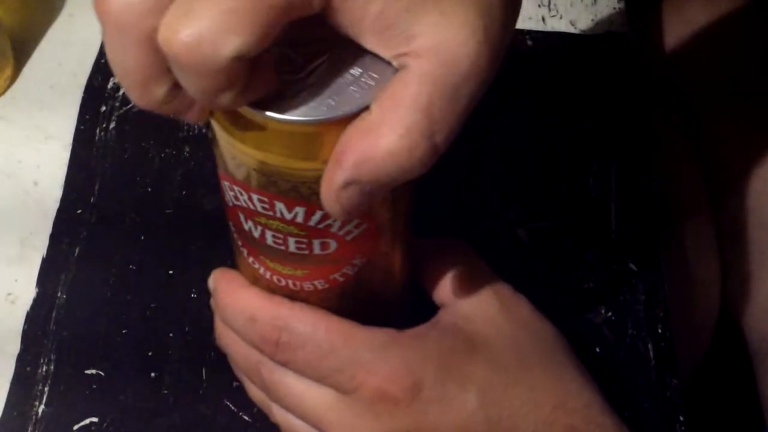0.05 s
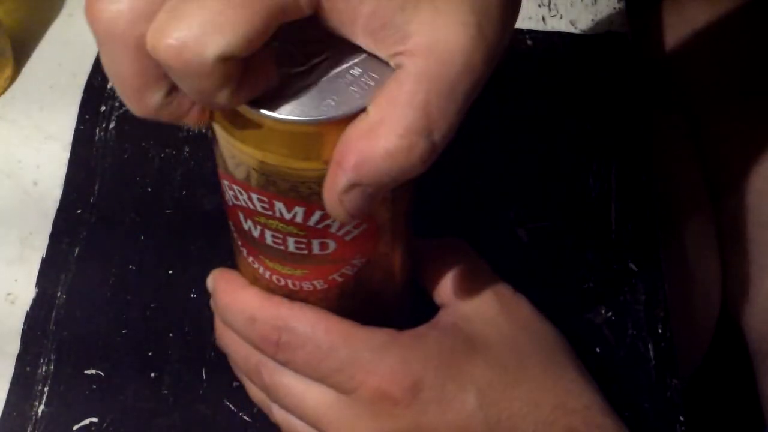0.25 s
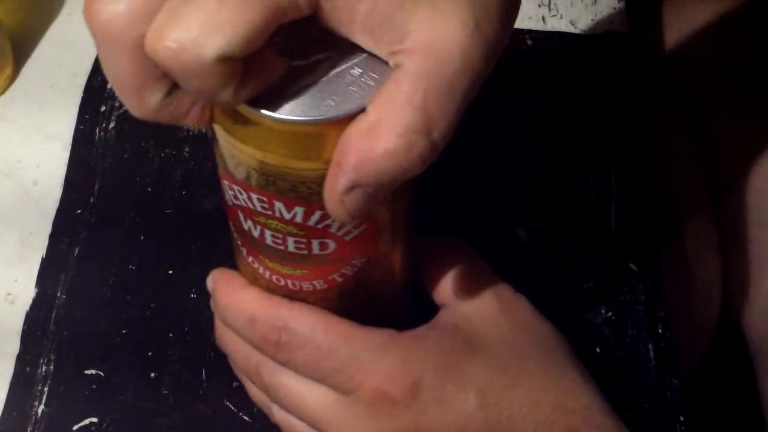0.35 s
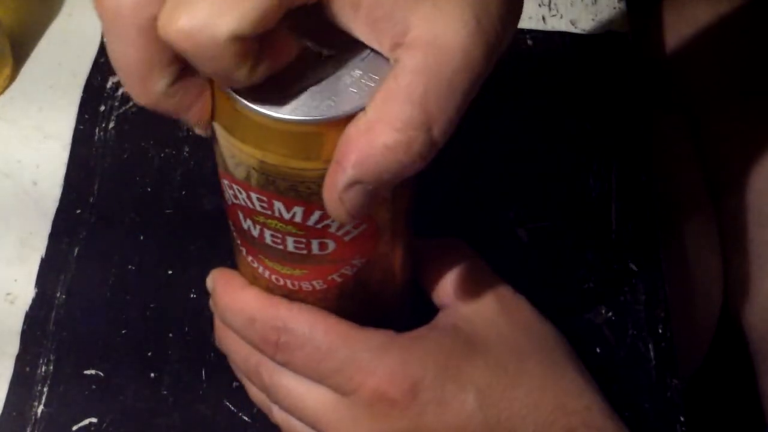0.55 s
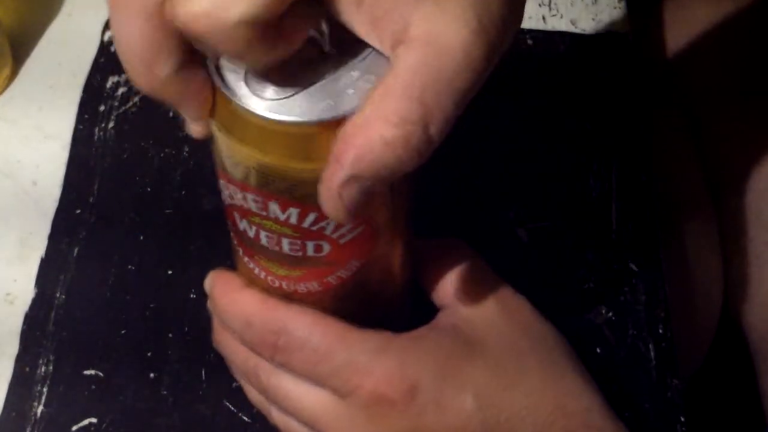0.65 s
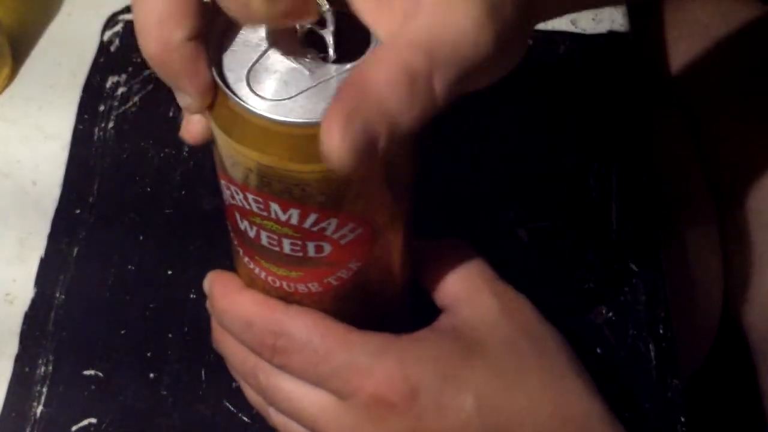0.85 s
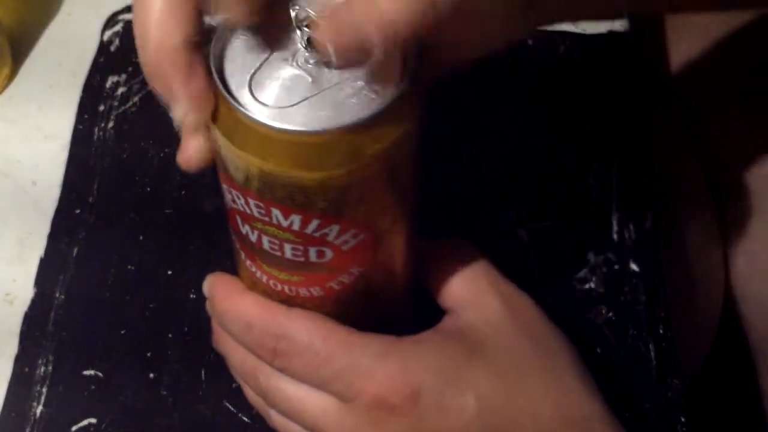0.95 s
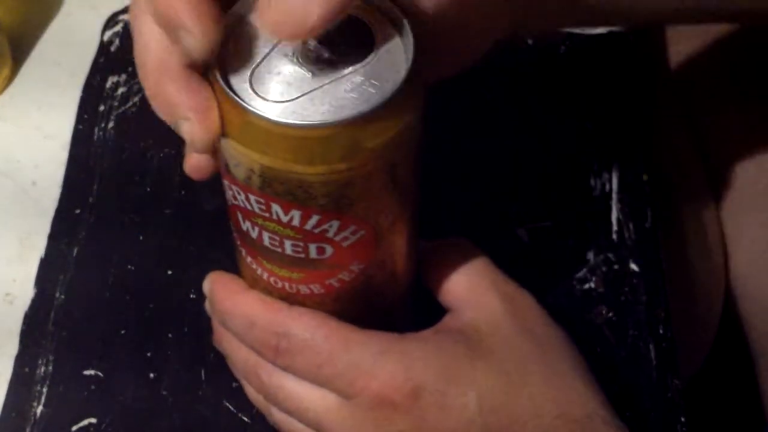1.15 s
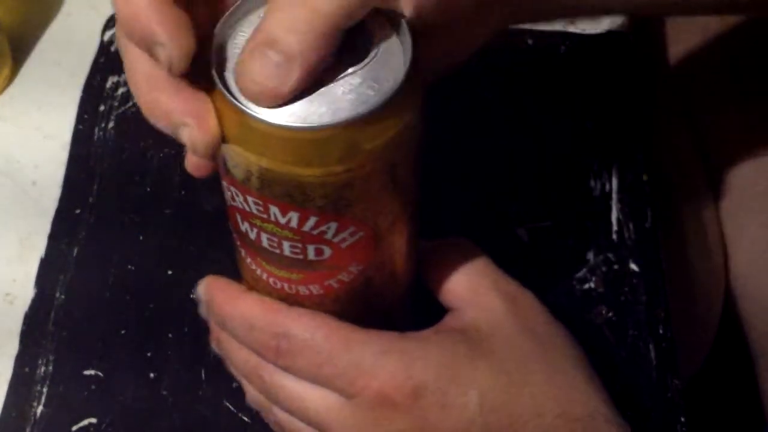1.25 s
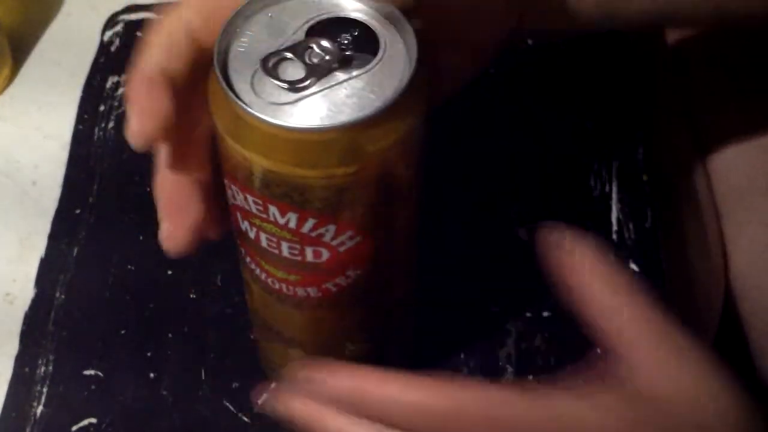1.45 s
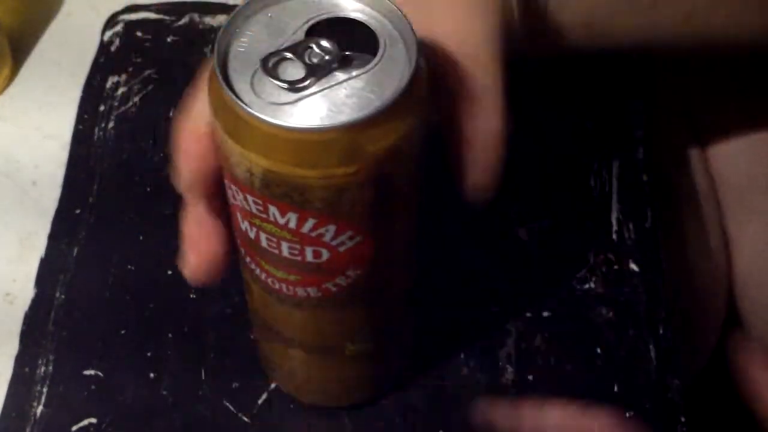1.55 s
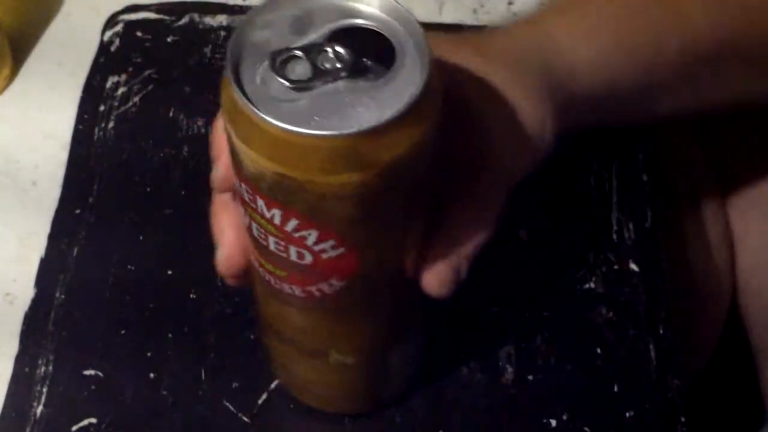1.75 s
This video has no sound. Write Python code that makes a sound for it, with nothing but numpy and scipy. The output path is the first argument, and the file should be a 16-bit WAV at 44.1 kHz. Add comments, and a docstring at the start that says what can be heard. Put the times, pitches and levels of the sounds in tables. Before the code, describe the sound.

A tall aluminium drink can is opened close up in a small room. Low hum and thin hiss dip around 0.24 s as small metallic ticks run until 0.47 s. A short gas hiss with a pop comes near 0.5 s, a snap at 0.69 s, and the loudest tearing crack at 0.82 s. Soft finger taps follow at 1.05-1.18 s, the tab clicks at 1.38 s, and a dull handling bump lands at 1.54 s before the hum returns.

```python
"""A small room: a tall aluminium drink can is opened close by. The tab creaks, gas hisses out and the lid pops flat;
the score snaps and tears open, the tab is pushed back and the hands bump the can. Metal parts are sums of damped modes
with coloured cracks; gas, taps and skin are shaped noise. Hum, rumble and a thin hiss lie behind, low from about
0.24 s to 1.5 s."""
import sys
import numpy as np
from scipy import signal
from scipy.fft import rfft, irfft
from scipy.io import wavfile

SR = 44100
rng = np.random.default_rng(int(sys.argv[2]) if len(sys.argv) > 2 else 0)


def store_pcm(level_fs):
    """Save levels as 16-bit WAV."""
    pcm = np.round(np.clip(level_fs, -1, 1) * 32767).astype(np.int16)
    wavfile.write(sys.argv[1], SR, np.atleast_2d(pcm).T)


N = 79380
T = np.arange(N) / SR

# loose tab on the open lid, modes: (frequency [Hz], relative level [dB], t60 [s])
TAB_MODES = [(974, 0, 0.046), (1080, -4, 0.035), (1400, -5, 0.011), (1614, -7, 0.037), (2300, -9, 0.011),
             (2830, -9.5, 0.039), (3580, -5, .018), (4100, -8, 0.022), (4450, -5, 0.018),
             (5070, -3.5, 0.021), (7770, -10, 0.02)]
# flap giving way: (time [s], lid level [dB], opened-can level [dB], crack gain [dB])
FLAP_SNAPS = [(0.8244, -10.5, -21, -11), (.8258, -10.5, -4.5, 8.5), (0.8282, -13, -12, 2)]
# tab falling back and bouncing: (time [s], ring level [dB], crack gain [dB])
TAB_FALLS = [(1.3819, -18.5, -10.5), (1.3834, -23, -17.5)]


def undb(db):
    """Decibels to gain."""
    return 10 ** (np.asarray(db) / 20)


def fade(t60_s):
    """Exponential decay from time zero, 60 dB down at t60_s."""
    return np.exp(-np.log(1000) * T / t60_s)


def at(x, start_s):
    """Delay a sound to start at start_s."""
    silence = np.zeros(int(round(start_s * SR)))
    return np.concatenate([silence, x])[:N]


def colour(x, points):
    """Minimum-phase filter through (Hz, dB) points, by folding the cepstrum."""
    hz, db = np.array(points, float).T
    grid_hz = np.maximum(np.arange(N + 1) * SR / (2 * N), 1)
    grid_db = np.interp(np.log(grid_hz), np.log(hz), db)
    cepstrum = irfft(np.log(undb(grid_db)))
    cepstrum[1:N] *= 2
    cepstrum[N + 1:] = 0
    response = np.exp(rfft(cepstrum))
    return irfft(rfft(x, 2 * N) * response)[:N]


def noise(points):
    """Coloured noise of rms 1."""
    x = colour(rng.standard_normal(N), points)
    return x / x.std()


def ring(modes, pitch_ratio=1, rise_s=0.00016):
    """Damped modes struck at time zero, neighbours in opposite phase; peak 1."""
    x = 0
    for k, (hz, db, t60_s) in enumerate(modes):
        x = x + (-1) ** k * undb(db) * np.sin(2 * np.pi * hz * pitch_ratio * T) * fade(t60_s)
    x = x * (1 - np.exp(-T / rise_s))
    highpass = signal.butter(2, 0.65 * modes[0][0], "high", fs=SR, output="sos")
    x = signal.sosfilt(highpass, x)
    return x / np.abs(x).max()


def crack(grit=0.19, grit_t60_s=0.0054):
    """A sharp release in the metal: coloured impulse with a few milliseconds of noisy grit."""
    # crack in the metal, colour: (frequency [Hz], gain [dB])
    crack_colour = [(300, -37), (1200, -7), (2000, 2.5), (5000, 4.5), (7000, -6), (10000, -12.5),
                    (13500, -16.5), (15300, -19)]
    impulse = T == 0
    return colour(impulse + grit * rng.standard_normal(N) * fade(grit_t60_s), crack_colour)


def background():
    """Hum partials, rumble and thin hiss; levels drop abruptly at 0.22 s and near 0.5 s, and are back by about 1.5 s."""
    # background level: (time [s], hum and rumble gain [dB], hiss gain [dB])
    level_curve = [(0, 1, -1), (0.218, 1.5, -1.5), (0.241, -8, -10.5), (.46, -7, -9), (.5, -15.5, -20),
                   (.62, -18, -18.5), (0.801, -13.5, -6.5), (.88, -20, -6.5), (1.02, -7, -8),
                   (1.3, -7.5, -10), (1.5, 0.5, -2), (1.66, 2.5, 0.5), (1.8, 1.5, 0.5)]
    # hum partials: (frequency [Hz], rms ahead of the level curve [dB])
    hum_partials = [(59.2, -50), (108, -51), (164, -52), (237, -56.5)]
    # rumble spectrum: (frequency [Hz], relative density [dB per Hz])
    rumble_colour = [(13, -47), (22, -3.5), (54, 1), (81, -7), (156, -6), (374, -12.5), (412, -12),
                     (625, -10.5), (911, -21.5), (1030, -17), (2500, -25), (3250, -45), (5500, -120)]
    # hiss spectrum: (frequency [Hz], relative density [dB per Hz])
    hiss_colour = [(1500, -17.5), (2500, -8.5), (3500, -4), (4300, 3.5), (4800, -8.5), (5500, -18.5),
                   (7000, -22), (10000, -26.5), (15500, -29.5)]
    rumble_db, hiss_db = -43, -46  # rms ahead of the level curve
    time_s, low_db, high_db = np.array(level_curve).T
    hum = 0
    for hz, db in hum_partials:
        hum = hum + undb(db) * np.sqrt(2) * np.sin(2 * np.pi * (hz * T + rng.random()))
    rumble = undb(rumble_db) * noise(list(rumble_colour) + [(8000, -49)])
    hiss = undb(hiss_db) * noise(hiss_colour)
    low_gain = undb(np.interp(T, time_s, low_db))
    high_gain = undb(np.interp(T, time_s, high_db))
    return low_gain * (hum + rumble) + high_gain * hiss


def struck_lid(pivot_hz=1000, focus_db=0, focus_octaves=0.31):
    """Lid modes, tilted by focus_db towards the pivot (negative: away from it; 0: untilted)."""
    # lid modes: (frequency [Hz], level ahead of the tilt [dB], t60 [s])
    lid_modes = [(1850, -7.5, 0.025), (2084, -6.5, 0.016), (2528, -12.5, 0.031), (2735, -7.5, 0.013),
                 (3390, -5.5, 0.013), (3580, -1, 0.019), (3970, -2, 0.019), (4235, -7.5, 0.035),
                 (4330, -5, 0.012), (4770, -12.5, 0.018), (5120, -14, 0.013), (6280, -21, 0.018),
                 (7970, -27, 0.013)]
    tilted = []
    for hz, db, t60_s in lid_modes:
        distance = min(abs(np.log2(hz / pivot_hz)) / focus_octaves, 1)
        tilted.append((hz, db - focus_db * distance, t60_s))
    return ring(tilted)


def lid_ticks():
    """The sealed lid ticks under the tab: each small crack rings the lid with its own balance of modes."""
    # ticks: (time [s], ring level [dB], crack gain [dB], pivot of the tilt [Hz], tilt towards it [dB])
    ticks = [(0.2268, -12, -14.5, 3360, 7), (.2760, -23, -29, 3760, 8.5), (0.3224, -35.5, -45, 3500, 0),
             (.3600, -13.5, -18, 3850, 8), (0.4342, -22.5, -36, 3900, 3.5), (0.4399, -23, -33, 4000, 1),
             (0.4739, -12.5, -4, 4200, -1)]
    out = 0
    for s, ring_db, crack_db, pivot_hz, focus_db in ticks:
        tick = undb(ring_db) * struck_lid(pivot_hz, focus_db) + undb(crack_db) * crack()
        out = out + at(tick, s)
    return out


def room(x):
    """Quick reflections from the table and hands, then the short tail of the room, as decaying noise."""
    # reflected sound, colour: (frequency [Hz], gain [dB])
    room_colour = [(150, 0.5), (700, -1.5), (1800, -2), (3200, 0), (4500, -5), (6500, -3), (9000, -5.5),
                   (15000, -15)]
    onset_s = 0.0048
    response = 0
    for t60_s, db in ((0.045, -14.5), (0.27, -12)):  # early, late; dB of energy ahead of the colour
        tail = rng.standard_normal(N) * fade(t60_s) * np.minimum(T / onset_s, 1) ** 2
        response = response + undb(db) * tail / np.sqrt(np.sum(tail ** 2))
    return signal.fftconvolve(x, colour(response, room_colour))[:N]


def gas(pop_s=.5388, pop_db=-15):
    """Gas noise swells through the first slit and runs out; the dome pops as the pressure drops."""
    # escaping gas, colour: (frequency [Hz], relative level [dB])
    gas_colour = [(800, -25), (1900, -22), (3000, -12.5), (4100, 5), (4900, -1), (5800, -11.5),
                  (7200, -15.5), (8000, -8.5), (8900, -14), (10400, -0.5), (12300, -12.5), (14200, -7),
                  (15600, -18)]
    # lid's dome popping flat, modes: (frequency [Hz], relative level [dB], t60 [s])
    dome_modes = [(1000, -14, 0.0065), (1410, -8, 0.015), (1784, -2.5, 0.015), (1924, -0.5, 0.014),
                  (2740, -9, 0.0084), (3900, -3, 0.007)]
    start_s, rise_s, hold_s, fall_s, hold_db = 0.4875, 0.033, 0.016, 0.072, -33
    rise = np.clip((T - start_s) / rise_s, 0, 1)
    fall = np.clip(1 - (T - start_s - rise_s - hold_s) / fall_s, 0, 1) ** 1.22
    hiss = undb(hold_db) * rise * fall * noise(gas_colour)
    return hiss + at(undb(pop_db) * ring(dome_modes), pop_s)


def recoils():
    """The can recoils at the strongest snaps: low-weighted coloured impulses."""
    # recoils: (time [s], gain [dB])
    recoil_times = [(.5389, -9), (.6881, -5), (.8256, 3.5)]
    # recoil colour: (frequency [Hz], gain [dB])
    thud_colour = [(30, -6), (180, -3), (500, -3), (1000, 3.5), (1700, -20), (4000, -52)]
    thud = colour(1. * (T == 0), thud_colour)
    return sum(at(undb(db) * thud, s) for s, db in recoil_times)


def tab_lift(lift_s=.688, ring_db=-9, crack_db=-12):
    """The lid, strained by the lifted tab, snaps once and rings."""
    # strained lid, modes: (frequency [Hz], relative level [dB], t60 [s])
    strained_modes = [(1990, -9, 0.0084), (3080, -9, .016), (3400, -9.5, .017), (3930, -3, .008),
                      (4666, -12, .018), (5490, -12, .008), (6400, -26, .006), (8500, -11, .004)]
    return at(undb(ring_db) * ring(strained_modes) + undb(crack_db) * crack(), lift_s)


def ring_and_crack(events, part):
    """One ringing part excited at each (s, ring dB, crack dB), each time with a fresh crack."""
    return sum(at(undb(ring_db) * part + undb(crack_db) * crack(), s) for s, ring_db, crack_db in events)


def score_tears():
    """The score tears in jerks, each ringing the heavily damped flap."""
    # jerks of the tear: (time [s], ring level [dB], crack gain [dB])
    jerks = [(.7997, -26, -38), (.8027, -21, -22), (.8041, -21, -27), (.8103, -21, -33), (.8156, -5, -7),
             (.8177, -16, -25), (.8190, -10, -21), (.8219, -16, -31)]
    # tearing flap, modes: (frequency [Hz], relative level [dB], t60 [s])
    flap_modes = [(1950, -17, 0.017), (2850, -19, 0.011), (3850, 0, .01), (4380, -1, 0.0087),
                  (5550, -27, 0.0079), (7920, -25, .018)]
    return ring_and_crack(jerks, ring(flap_modes))


def flap_snaps():
    """The flap gives way: cracks ring the lid, the opened can and the air in it."""
    # opened can and its air, modes: (frequency [Hz], relative level [dB], t60 [s])
    open_can_modes = [(880, -11, 0.019), (1057, -6, 0.0096), (1660, -9, 0.022), (1867, -1, 0.03),
                      (2480, -15.5, 0.0094), (2830, -13.5, 0.019), (4683, 3.5, 0.023), (5350, -11.5, 0.021),
                      (6393, -9, 0.031)]
    metal, hollow = struck_lid(), ring(open_can_modes)
    out = 0
    for s, lid_db, can_db, crack_db in FLAP_SNAPS:
        snap = undb(lid_db) * metal + undb(can_db) * hollow + undb(crack_db) * crack()
        out = out + at(snap, s)
    return out


def shimmer(tab_db=-14):
    """Long modes of the freed lid ring faintly after the flap gives way, and again under the falling tab."""
    # freed lid, modes: (frequency [Hz], level at the flap's snap [dB], t60 [s])
    long_modes = [(963, -44.5, 0.19), (1428, -43.5, 0.18), (2950, -39, .25), (3600, -37, .18),
                  (4480, -36.5, 0.23), (4580, -41, .18), (6360, -46, .22), (6440, -58, 0.48),
                  (7950, -52, 0.27)]
    after = sum(undb(db) * np.sin(2 * np.pi * hz * T) * fade(t60_s) for hz, db, t60_s in long_modes)
    return at(after, FLAP_SNAPS[1][0]) + undb(tab_db) * at(after, TAB_FALLS[0][0])


def bumps(push_s=0.00099):
    """Hands and flap jolt the full can: a soft exponential push smooths its low modes."""
    # jolts: (time [s], peak level [dB], pitch ratio [1])
    jolts = [(0.8261, -37, 1.0), (1.1664, -23.5, 1.08), (1.184, -30.5, 1.145), (1.537, -20.5, 0.985)]
    # full can held on the table, modes: (frequency at pitch ratio 1 [Hz], relative level [dB], t60 [s])
    body_modes = [(129, -3, 0.077), (195.2, -2, 0.1), (327.3, -5.5, 0.064), (562, -10.5, 0.038),
                  (1022, -5, 0.068), (1707, -9.5, 0.076)]
    push = np.exp(-T / push_s)
    out = 0
    for s, db, pitch_ratio in jolts:
        bump = signal.fftconvolve(ring(body_modes, pitch_ratio), push)[:N]
        out = out - at(undb(db) * bump / np.abs(bump).max(), s)
    return out


def finger_taps(t60_s=.012, ring_db=-5, top_hz=2500):
    """Fingers tap the rim with brief noise and shake the loose tab, softly ringing only modes below top_hz."""
    # taps: (time [s], level [dB], peak of the noise colour [Hz])
    taps = [(1.0535, -37, 1500), (1.1097, -31, 806), (1.164, -38, 800), (1.172, -32, 550),
            (1.5386, -32, 920)]
    shaken_tab = undb(ring_db) * ring([mode for mode in TAB_MODES if mode[0] < top_hz])
    out = 0
    for s, db, hz in taps:
        skin = noise([(hz / 8, -12), (hz / 2, -4), (hz, 0), (hz * 1.22, -4), (hz * 3, -22), (hz * 8, -40)])
        out = out + at(undb(db) * (skin * fade(t60_s) + shaken_tab), s)
    return out


def tab_falls():
    """The loose tab falls back on the open lid and bounces, ringing with a crack at each hit."""
    return ring_and_crack(TAB_FALLS, ring(TAB_MODES))


def skin_rub():
    """Skin slides on the can: coloured noise under a short bell-shaped swell."""
    # slides: (time of the middle [s], half-width to 1/e [s], level at the middle [dB])
    rubs = [(1.532, 0.013, -39)]
    out = 0
    for s, width_s, db in rubs:
        swell = np.exp(-((T - s) / width_s) ** 2)
        skin = noise([(300, 1), (1100, 1), (4200, 0.5), (6000, -10.5), (14000, -33)])
        out = out + undb(db) * swell * skin
    return out


def scene(gas_room_db=-4):
    """The can in the room, over the background; the jet of gas points at the microphone and sounds drier."""
    lid = lid_ticks() + recoils() + tab_lift() + score_tears() + flap_snaps() + tab_falls()
    hands = bumps() + finger_taps() + skin_rub()
    can, jet = lid + hands, gas()
    reflected = room(can + undb(gas_room_db) * jet)
    return (can + jet + reflected + shimmer() + background())[None]


def record(dry, ceiling=.8, top_hz=15900):
    """The recorder rounds the loudest peaks and cuts the top."""
    rounded = dry / (1 + (dry / ceiling) ** 4) ** (1 / 4)
    lowpass = signal.ellip(8, .2, 70, top_hz, fs=SR, output="sos")
    return signal.sosfilt(lowpass, rounded)


dry = scene()
out = record(dry)
store_pcm(out)
```